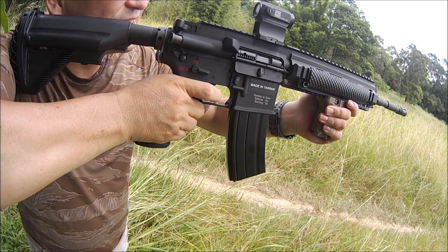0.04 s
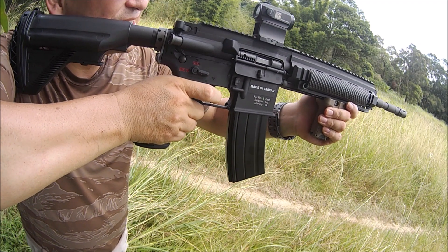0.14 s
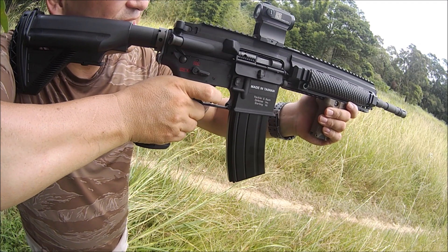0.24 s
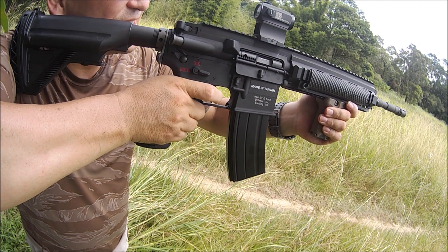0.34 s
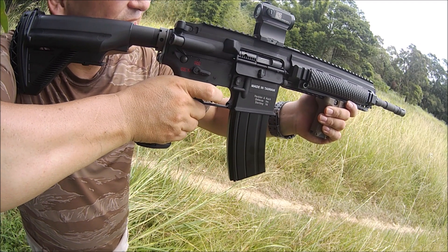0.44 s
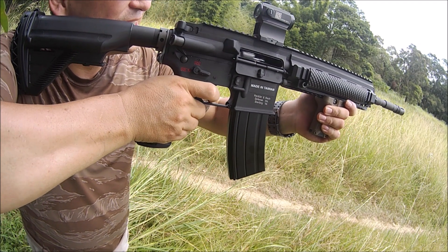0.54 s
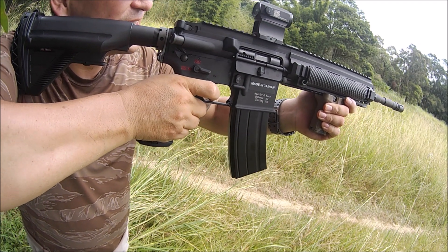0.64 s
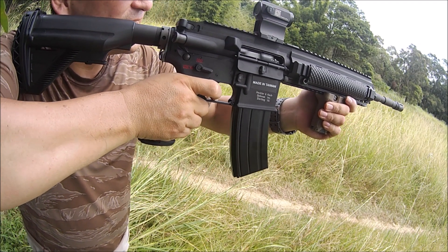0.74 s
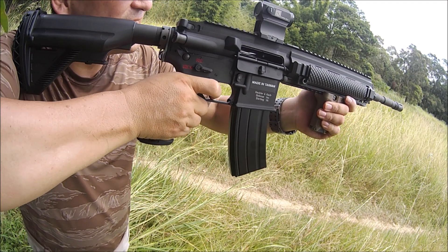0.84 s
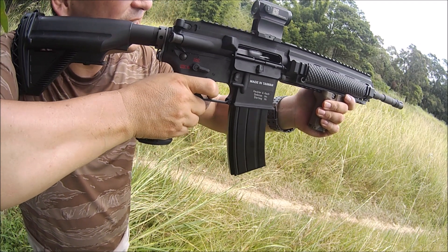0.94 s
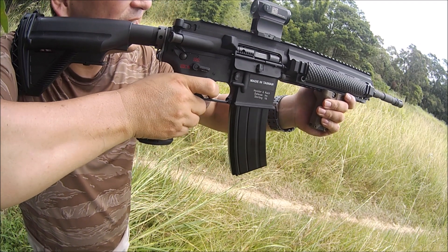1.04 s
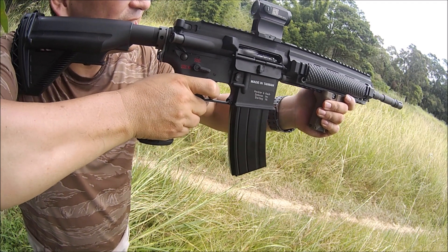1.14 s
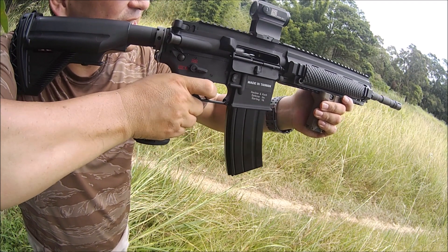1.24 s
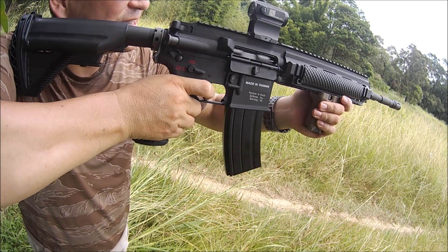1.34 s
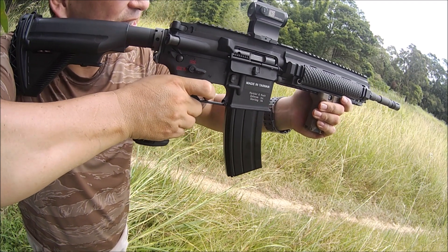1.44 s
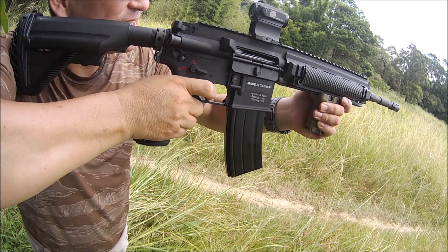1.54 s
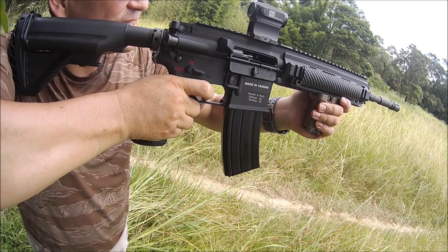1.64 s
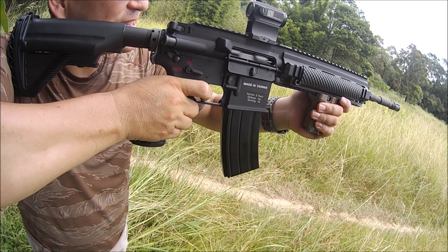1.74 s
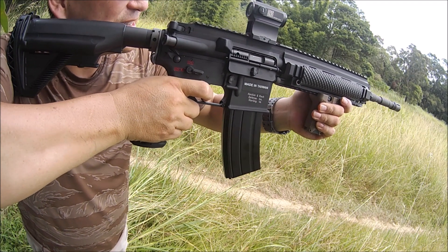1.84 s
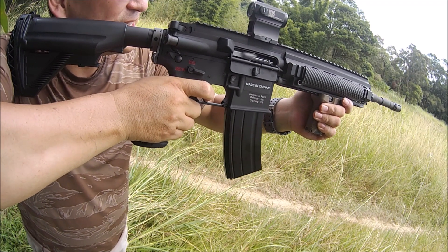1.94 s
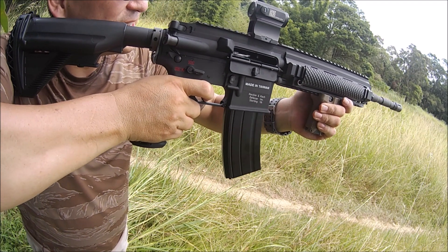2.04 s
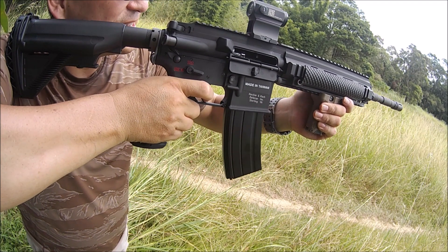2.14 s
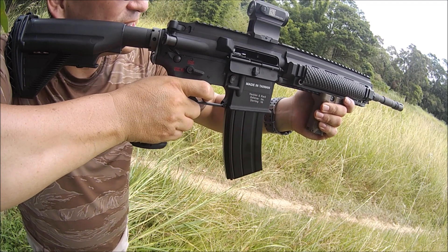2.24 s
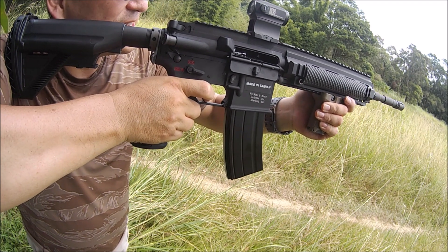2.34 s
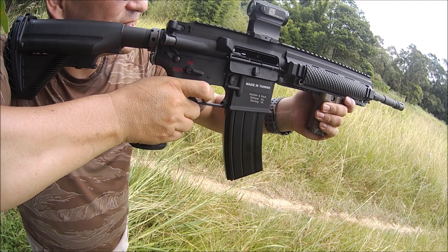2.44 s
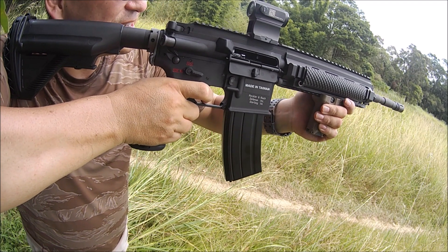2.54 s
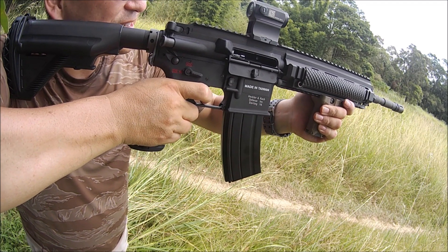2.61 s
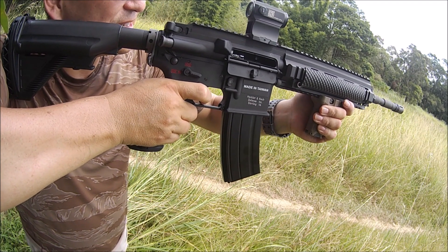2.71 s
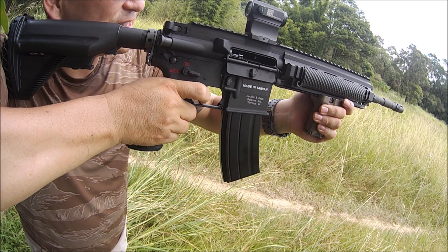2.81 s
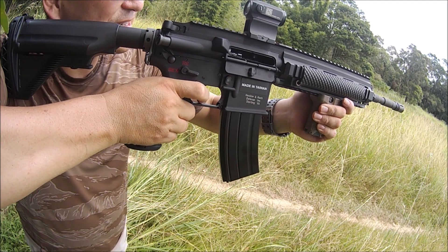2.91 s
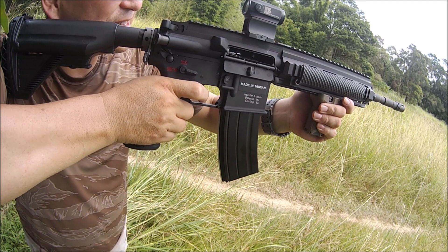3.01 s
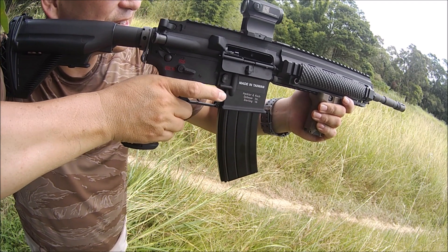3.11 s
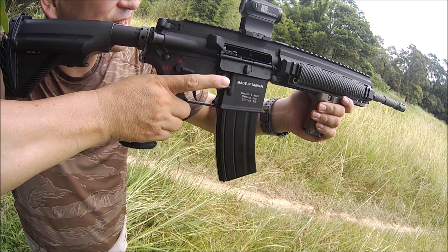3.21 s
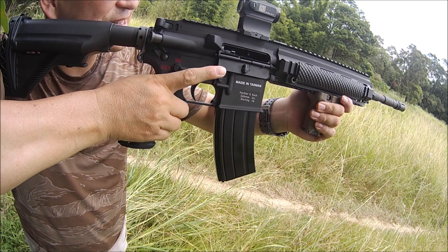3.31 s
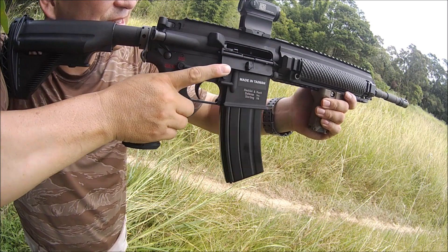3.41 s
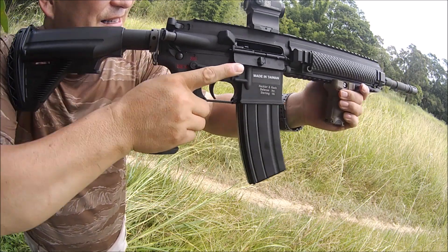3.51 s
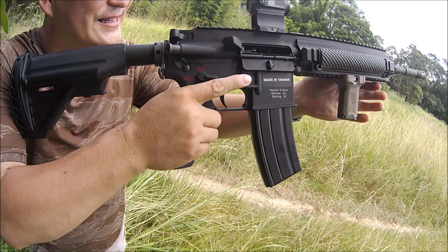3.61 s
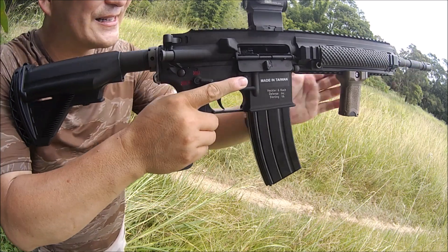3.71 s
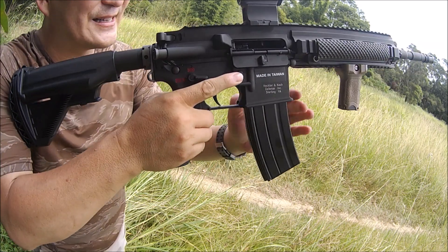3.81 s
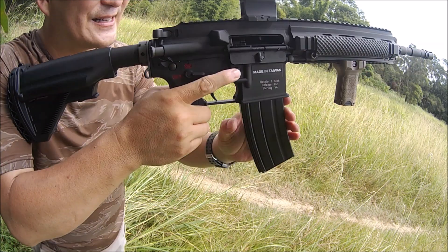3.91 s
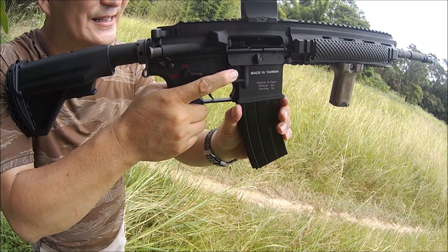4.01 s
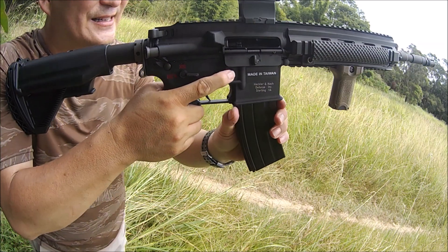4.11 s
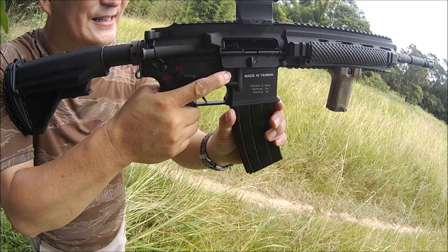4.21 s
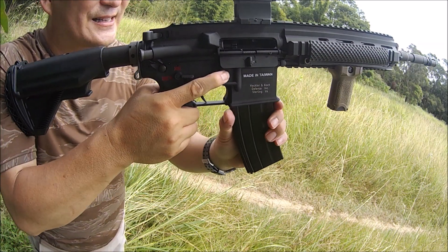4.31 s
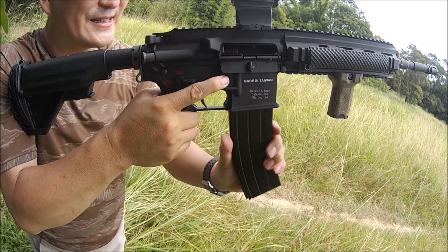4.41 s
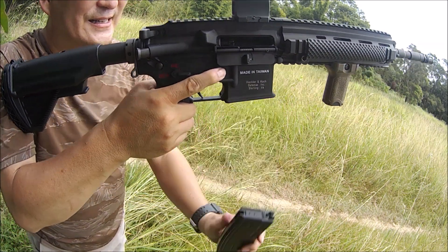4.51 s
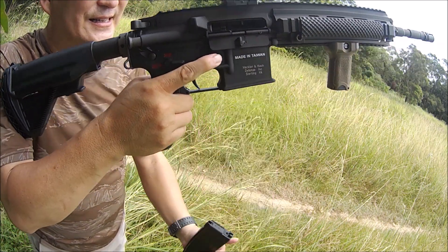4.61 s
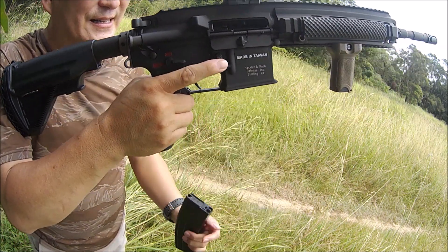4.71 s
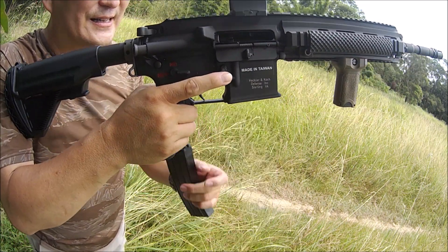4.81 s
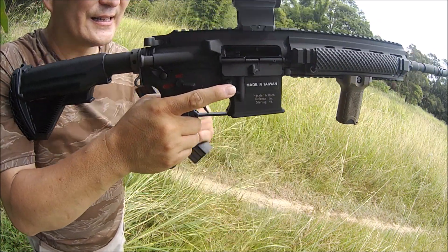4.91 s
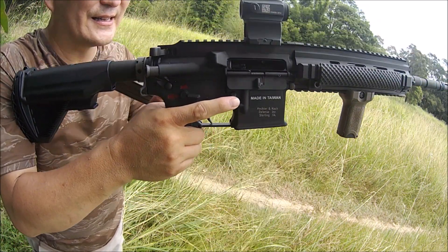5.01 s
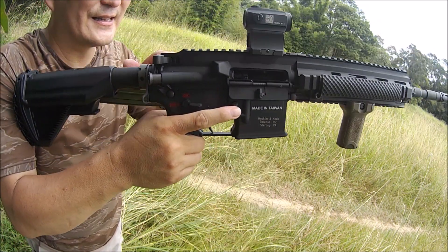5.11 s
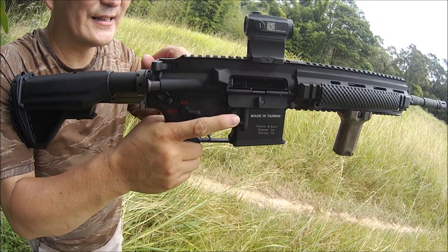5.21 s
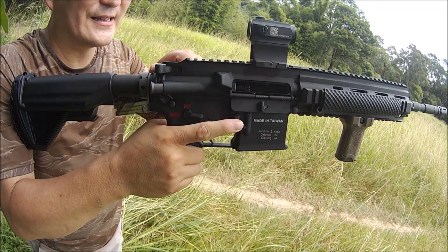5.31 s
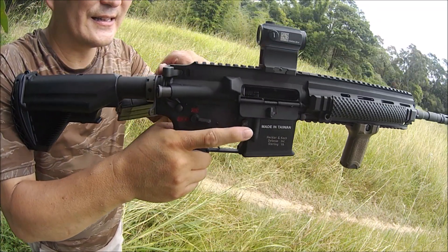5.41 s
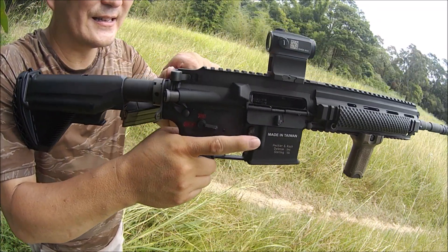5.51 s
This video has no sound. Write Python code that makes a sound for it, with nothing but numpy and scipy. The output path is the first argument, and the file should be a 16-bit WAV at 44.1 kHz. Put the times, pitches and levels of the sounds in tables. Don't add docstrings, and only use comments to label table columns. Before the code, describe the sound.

A gas airsoft rifle rattles off one long automatic burst very close, then a magazine is pulled with clicks amid shrill insects and faint bird notes.

```python
import sys
import numpy as np
from scipy import signal
from scipy.fft import rfft, irfft
from scipy.io import wavfile
from scipy.ndimage import uniform_filter1d

SR = 44100
rng = np.random.default_rng(int(sys.argv[2]) if len(sys.argv) > 2 else 0)


def file_out(sig):
    cols = np.atleast_2d(sig).T
    lim = np.clip(cols, -1, 1)
    pcm = np.round(lim * 32767).astype(np.int16)
    wavfile.write(sys.argv[1], SR, pcm)


def voltage_ratio(level):
    return 10 ** (np.asarray(level, float) / 20)


N = 244755
T = np.arange(N) / SR

# pitch in Hz, width in Hz, level in dB.
STEEL_MODES = [(3100, 1500, -4.5), (4500, 460, -9), (6580, 380, -2), (6990, 240, -4), (7780, 680, -0.5),
               (8900, 300, 0.5), (9400, 600, 2)]
# pitch in Hz, width in Hz, level in dB.
RECEIVER_MODES = [(450, 1000, -7.5), (836, 270, -8), (1100, 240, -11.5), (1542, 300, -4), (1650, 100, -7.5),
                  (2100, 1200, -14)]
# frequency in Hz, level in dB per Hz.
GAS_COLOUR = [(180, -23.5), (300, -15), (938, -9), (1620, -13), (2210, -7.5), (5490, -3), (9010, -1.5),
              (15500, -14)]
# hammer time in seconds, hammer level in dB, sear level in dB,
# milliseconds until the bolt reaches the buffer, buffer level in dB.
ROUNDS = [(0.6671, -1.5, -5.5, 20.7, 2), (.747, -6.5, -12, 18.2, -5.5), (0.8257, -9.5, -24.5, 20.6, -3),
          (0.9053, -8.5, -17.5, 22, -5.5), (0.9838, -7.5, -18.5, 19.5, -7.5),
          (1.0614, -7.5, -27.5, 19, -6.5), (1.14, -9, -15, 19.5, -7), (1.2193, -9, -17.5, 19.8, -8),
          (1.2972, -7.5, -16, 19.6, -9.5), (1.377, -4.5, -13.5, 17.8, -8.5), (1.4565, -9, -15, 17.6, -8),
          (1.5352, -8, -14, 19.8, -5.5), (1.6151, -8.5, -17, 20.7, -7), (1.696, -7, -17, 20, -5),
          (1.7773, -6, -15.5, 19.4, -7.5), (1.8601, -6.5, -16.5, 19, -6), (1.941, -10, -11.5, 20, -5),
          (2.0233, -5, -14.5, 18.9, -6.5)]
# slam time in seconds, slam level in dB,
# milliseconds until the bounce and gas puff, bounce level in dB, puff level in dB.
SLAMS = [(0.6267, 5.5, 5.1, -5, -4), (0.706, 4.5, 4.7, -9.5, -9.5), (0.785, -5, 2.1, 0, -16),
         (.8625, 3, 4.5, -13, -14.5), (0.9411, -1.5, 4.6, -8, -12.5), (1.0216, 0, 0.73, -15.5, -19),
         (1.0983, -6.5, 2.6, -0.5, -14.5), (1.178, -4, 0.79, -3, -13), (1.2553, -0.5, 4.6, -9.5, -16.5),
         (1.3348, 0, 2.9, -9, -18), (1.4153, -1.5, 1.9, -14, -10.5), (1.494, -2.5, 3.35, -9, -17),
         (1.5739, -5, 1.2, -11, -12.5), (1.6523, -4.5, 5.8, -10, -20), (1.7365, -6.5, 2.7, -10.5, -13.5),
         (1.8166, -5, 2.8, -16.5, -12), (1.895, -8.5, 5.6, -2.5, -12), (1.9793, -3.5, 6.8, -10.5, -19.5),
         (2.063, -11, 3, -3, -14)]
REST_DB = 2.5


def curve(rows):
    return np.interp(T, *np.transpose(rows))


def unit(x):
    return x / np.sqrt(np.mean(x ** 2))


def colour(points):
    hz, db = np.transpose(points)
    bins = np.arange(N // 2 + 1) * SR / N + 1
    shape = voltage_ratio(np.interp(np.log(bins), np.log(hz), db))
    return unit(irfft(rfft(rng.standard_normal(N)) * shape, N))


def walk(rate):
    size = int(SR / rate)
    once = uniform_filter1d(rng.standard_normal(N), size)
    return unit(uniform_filter1d(once, size))


def ring(x, hz, width_hz):
    b, a = signal.iirpeak(hz, hz / width_hz, fs=SR)
    return signal.lfilter(b, a, x) * np.sqrt(SR / np.pi / width_hz)


def repeats(rows, counts):
    out = []
    for (s, gap, *rest), count in zip(rows, counts):
        out += [(s + k * gap, k, *rest) for k in range(count)]
    return np.array(out)


def contacts(s, db, ring_ms, rise_ms, slide_db):
    before, length = 400, 3000
    out = np.zeros(N + length)
    t = np.arange(-before, length - before) / SR * 1000
    after = np.maximum(t, 0)
    slide = np.exp(np.minimum(t, 0) / 2.6)
    for at, gain, fall, lead in np.broadcast(s, voltage_ratio(db), ring_ms, voltage_ratio(slide_db)):
        landing = lead * slide + 1 - np.exp(-after / rise_ms)
        out[int(at * SR):][:length] += gain * landing * np.exp(-after / max(fall, .2))
    return out[before:N + before]


def body(modes, s, db, ring_ms, scatter_db, rise_ms, slide_db):
    spot = scatter_db * rng.standard_normal((len(s), len(modes)))
    grit = rng.standard_normal(N) * voltage_ratio(1.62 * rng.standard_normal(N))
    out = 0
    for k, (hz, width_hz, mode_db) in enumerate(modes):
        blows = contacts(s, db + mode_db + spot[:, k], ring_ms, rise_ms, slide_db)
        out = out + (-1) ** k * ring(grit * blows, hz, width_hz)
    return out


def pushes(rows, rebound_hz):
    out = 0
    for s, db, ms in rows:
        out = out + voltage_ratio(db) * np.exp(-.5 * ((T - s) * 2355 / ms) ** 2)
    return signal.lfilter(*signal.butter(1, rebound_hz, "high", fs=SR), out)


def field():
    # frequency in Hz, level in dB per Hz.
    field_colour = [(30, -15.5), (130, -16.5), (330, -25), (1100, -27), (1450, -31), (2050, -27),
                    (2700, -14.5), (4800, -10.5), (9300, -7.5), (10700, -8.5), (12000, -22), (15500, -41.5)]
    spectrum = rfft(colour(field_colour))
    octave = np.log2(np.arange(N // 2 + 1) * SR / N + 1)
    out = 0
    for middle in np.arange(4, 14.6, .5):
        band = np.clip(1 - 2 * np.abs(octave - middle), 0, 1)
        out = out + irfft(spectrum * band, N) * voltage_ratio(.9 * walk(14))
    return out * voltage_ratio(-43.5)


def cicadas():
    # first throb in seconds, gap in seconds, level in dB.
    bouts = [
        (.24, .17, -43),
        (2.31, .173, -42),
        (3.19, .168, -43.5),
        (4.23, .17, -46),
        (4.94, .197, -47.5),
    ]
    throb_counts = [1, 5, 5, 1, 4]
    throb = 0
    for s, _, db in repeats(bouts, throb_counts):
        throb = throb + voltage_ratio(db) * np.exp(-((T - s) / 0.032) ** 2)
    return throb * colour([(3000, -63.0), (4500, -7.5), (7500, -4.0), (9500, -3.5), (11500, -32)])


def crickets():
    # share of the stroke rate, wing pitch in Hz, width in Hz, level in dB, skirt level in dB.
    singers = [
        (1, 10330, 260, -47.5, -12),
        (.935, 10450, 500, -52, -10),
    ]
    # time in seconds, wing strokes per second.
    stroke_rate = [(0, 125.5), (4.05, 125.5), (4.25, 125.22), (4.8, 125.22), (5.55, 125.18)]
    out = 0
    for share, hz, width_hz, db, skirt_db in singers:
        strokes = np.cumsum(share * curve(stroke_rate) * (1 + .0007 * walk(9))) / SR
        turn = np.exp(2j * np.pi * strokes).astype(np.complex64)
        line, song = turn ** 66, 0
        for k in range(67, 102):
            line = line * turn
            off = (k * share * stroke_rate[0][1] - hz) / width_hz
            wing = 1 / (1 + 1j * off) ** 2 + voltage_ratio(skirt_db) / (1 + (off * width_hz / 1300) ** 4)
            uneven = voltage_ratio(3.6 * rng.standard_normal()) * np.exp(.6j * rng.standard_normal())
            song = song + np.complex64(wing * uneven) * line
        out = out + voltage_ratio(db + 1.1 * walk(22)) * unit(song.imag)
    return out


def bird():
    # first note in seconds, gap in seconds, first level in dB,
    # swell in dB per note, middle pitch in Hz.
    phrases = [(.039, 0.098, -54.5, 1, 1037), (.466, 0.11, -59.5, 12, 1010),
               (2.301, .103, -51.5, -0.5, 1040), (2.66, .0565, -51.5, -0.6, 1132),
               (2.945, 0.071, -60, -.5, 1062), (3.205, 0.093, -58.5, 2.2, 1114),
               (3.552, 0.062, -52.5, 0, 1035), (3.853, 0.094, -54, 2, 1146), (4.219, .1, -56.5, -3.5, 1134),
               (4.315, 0.066, -52, -0.5, 1166), (4.53, 0.12, -52.5, 1, 948), (4.77, 0.065, -48.5, -2, 1122),
               (4.868, .1, -54, 1, 980), (4.886, 0.081, -54, 1.5, 1087), (5.545, .1, -58, 1, 1240)]
    note_counts = [4, 1, 4, 4, 3, 4, 5, 3, 1, 2, 2, 4, 1, 3, 1]
    half = 1500
    out = np.zeros(N + 4000)
    t = np.arange(-half, half) / SR
    whistles = repeats(phrases, note_counts)
    chance = rng.uniform(.5, 1.2, (len(whistles), 2))
    for (s, place, first_db, swell_db, middle_hz), (fall, length) in zip(whistles, chance):
        db = first_db + place * swell_db
        hz = middle_hz * (1 - 0.29 * fall * np.tanh(t / 0.027))
        swell = voltage_ratio(db) * np.exp(-(t / (0.013 * length ** .5)) ** 2)
        out[int(s * SR):][:len(t)] += swell * np.sin(2 * np.pi * np.cumsum(hz) / SR)
    out = out[half:N + half] * voltage_ratio(1.5 * walk(180))
    trees = rng.standard_normal(6000) * voltage_ratio(-60 * T[:6000] / 0.3)
    return out + voltage_ratio(-35) * signal.fftconvolve(out, trees)[:N]


def camera_gain():
    duck_db, release_s, creep_s = -18, 2.343, .27
    since = np.maximum(T - release_s, 0)
    cut = (T > ROUNDS[0][0]) * np.exp(-(since / creep_s) ** 1.2)
    return voltage_ratio(REST_DB + duck_db * cut)


def cut_band(x, hz, kind):
    return signal.sosfilt(signal.butter(2, hz, kind, fs=SR, output="sos"), x)


def handling():
    # time in seconds, peak level in dB,
    # hollow share in dB, bright share in dB, main ring in Hz.
    knocks = [(3.039, -51.5, -9, -11.5, 1300), (3.751, -53.5, 8, -9, 750), (3.822, -55, -11, -15, 1945),
              (4.1471, -30.5, -21, 6, 2330), (4.1484, -41, -26, -6.5, 1440), (4.385, -48.5, -6, 2.5, 2100),
              (4.4351, -39, -17, -18, 2900), (4.438, -32, -17, 4, 1820), (4.4488, -40, -13, -2, 1730),
              (4.453, -45.5, 11, -5.5, 2380), (4.4625, -16, 0.5, -9, 3000), (4.467, -27.5, -5, -19, 2400),
              (4.6101, -27.5, -18, -1, 1650), (4.67, -48, -16.5, -12.5, 1880), (5.119, -30, 4, -9.5, 1720),
              (5.131, -27, 4.5, -8, 1300), (5.144, -45.5, 7.5, -7.5, 940), (5.292, -46, 8.5, -21, 391),
              (5.33, -54.5, 7, -20, 337), (5.3365, -32, -0.5, -2.5, 3290), (5.35, -56, 13, -16, 419),
              (5.454, -53.5, 10.5, -21.5, 1270)]
    # pitch in Hz, width in Hz, level in dB.
    shell_modes = [
        [(410, 2300, 8), (900, 196, 2.5), (1150, 520, -11.5)],
        [(3060, 1500, 3), (4850, 2600, 9.5), (6540, 820, 7), (8820, 1100, 7)],
    ]
    magazine_drag, drag_ms = (4.424, -54, 3.5, 8, 2400), 45
    s, db, hollow_db, bright_db, knock_hz = np.transpose(knocks + [magazine_drag])
    ring_ms = np.append(1.7 - 0.2442 * (db[:-1] + 23), drag_ms)
    hollow = body(shell_modes[0], s, db + hollow_db - 5, ring_ms, 1.5, .1, -28)
    bright = body(shell_modes[1], s, db + bright_db - 5, ring_ms, 1.5, .1, -28)
    part = 0
    for at, size_db, ms, hz in zip(s, db, ring_ms, knock_hz):
        touch = contacts([at], [size_db + 3], 0.52 * ms, 0.11, -52) * (1 + 1.7 * rng.standard_normal(N))
        part = part + ring(touch, hz, hz / 4.9)
    spark = body([(13200, 2400, -15.0)], s, db + 2 * bright_db, ring_ms, 1.5, .1, -25.0)
    hollow = cut_band(hollow, (250., 1600.), "band")
    part = cut_band(cut_band(part, 350., "high"), 350., "high")
    bright = cut_band(bright, (2400., 10500.), "band")
    return hollow + part + bright + cut_band(spark, 11000., "high")


def leak():
    # time in seconds, level in dB.
    leak_level = [
        (.503, -95),
        (.53, -13),
        (.565, -12),
        (.61, -22),
        (.7, -29),
        (1.0, -35),
        (2.09, -37),
        (2.145, -67),
        (2.32, -88),
    ]
    scrape = voltage_ratio(curve(leak_level) + 5 * walk(260))
    rough = rng.standard_normal(N) * scrape
    rattle = sum(voltage_ratio(db) * ring(rough, hz, width_hz) for hz, width_hz, db in RECEIVER_MODES + STEEL_MODES)
    return colour(GAS_COLOUR) * scrape + voltage_ratio(-11) * rattle


def tube():
    # pitch in Hz, level in dB, seconds to fall 60 dB.
    tube_modes = [(354, -48, 0.22)]
    after = np.maximum(T - 2.08, 0)
    return sum(voltage_ratio(db - 60 * after / t60) * np.sin(2 * np.pi * hz * after) for hz, db, t60 in tube_modes)


def gas_thumps():
    # time in seconds, level in dB, width in milliseconds.
    stray_puffs = [(.5318, -24, 1.3), (.5472, 8, 3), (.6221, -13.5, 1.4), (.8493, -14, 1.45),
                   (.9287, -26, 3.1), (1.1117, -26, 2), (1.299, -22, 2), (1.3782, -23.5, 1.7),
                   (1.6368, -11.5, 0.88), (2.0247, -25, 3)]
    # time in seconds, level in
    # dB, # width in milliseconds.
    surges = [
        (.5515, -2, 4),
        (.559, -3, 8),
        (.569, -14, 14),
        (2.2, -59, 30),
    ]
    slam_puffs = [(at + ms / 1000, puff_db, 1.76) for at, _, ms, _, puff_db in SLAMS]
    return pushes(surges, 4.) - 1.02 * pushes(stray_puffs + slam_puffs, 22.)


def strikes():
    # time in seconds, peak level in dB, ring in milliseconds, receiver share in dB.
    clatter = [(.5165, -19.5, 4, -5.5), (.5262, 0, 1.8, -23), (.5324, 0, 8.9, -26.5), (.541, 14.5, 4.8, 1),
               (.5524, 6.5, 4.1, -16.5), (.5602, -6, 1.6, -24), (.5708, -1, 2.6, -16.5),
               (.5774, -3, 2.8, -10.5), (0.5824, -9.5, 3, -14), (.589, 6, 2.7, -12.5),
               (.6017, 1, 1.4, -3.5), (.6093, 0, 5, -13.5), (.617, -2.5, 3, -3), (0.622, -3, 2, -6),
               (.6574, -12.5, 1.8, -8.5), (.6752, -8, 2.2, -10), (1.129, -14.5, 1.9, -5),
               (2.0767, -5.5, 3.1, -16.5), (2.091, -15, 0.72, -12.5), (2.0962, -32, 1.8, -9.5),
               (2.109, -28, 1.8, -5), (2.136, -41, 2.3, -20)]
    hammer_s, hammer_db, sear_db, back_ms, back_db = np.transpose(ROUNDS)
    slam_s, slam_db, bounce_ms, bounce_db, _ = np.transpose(SLAMS)
    back_s = hammer_s + back_ms / 1000
    bounce = (1.8, -12.5, -15.5)
    # (ring in ms, receiver share in dB, scrape before it in dB)
    cycle = [(hammer_s - .0196, sear_db, (4.6, -8, -25.5)),
             (hammer_s, hammer_db, (2.4, -12, -10.5)),
             (back_s - .0075, -14 + 0.73 * hammer_db, bounce),
             (back_s, back_db, (2.8, -15.5, -6)),
             (slam_s - .0066, -12.5 + .45 * slam_db, (2.4, -4.5, 2)),
             (slam_s, slam_db, (3.24, -6.5, -25)),
             (slam_s + bounce_ms / 1000, bounce_db, bounce)]
    rows = []
    for s, db, kind in cycle:
        rows += [(at, size_db, *kind) for at, size_db in np.broadcast(s, db)]
    return np.transpose(rows + [(*row, -18) for row in clatter])


def rifle():
    s, db, ring_ms, receiver_db, slide_db = strikes()
    slide_db = slide_db - 7.5
    steel = body(STEEL_MODES, s, db - 10, 0.98 * ring_ms, 2.5, 0.1, slide_db)
    hollow = body(RECEIVER_MODES, s, db + receiver_db + 3, 0.86 * ring_ms, 3.0, 0.14, slide_db)
    spit = colour(GAS_COLOUR) * contacts(s, db - 5.0, 1.095 * ring_ms, 0.43, slide_db)
    near = steel + hollow + spit
    t = T[:8000]
    slope = rng.standard_normal(len(t)) * voltage_ratio(-60 * t / .15) * (t > .004)
    wash = signal.fftconvolve(near, slope)[:N] * voltage_ratio(-49)
    return near + wash + leak() + tube() + gas_thumps()


def scene():
    hillside = voltage_ratio(-REST_DB) * bird() + field() + cicadas() + crickets()
    return (rifle() + handling() + camera_gain() * hillside)[None]


def thin_blocks(x):
    block_s = [0.153, .342, .47, 1.113, 1.233, 1.454, 2.348, 3.222, 3.329, 3.373, 3.498, 4.032, 4.717,
               5.381]
    size, count = 1600, 20
    width_hz, tone_db, left_db = 39, 7.5, -19.5
    out, fade = x.copy(), np.sqrt(np.hanning(size))
    hz = np.arange(size // 2 + 1) * SR / size
    for at in (np.array(block_s) * SR).astype(int) - size // 2:
        spectrum = rfft(x[at:at + size] * fade)
        tops = signal.find_peaks(np.abs(spectrum), distance=11)[0]
        strength = np.abs(spectrum[tops]) / hz[tops] ** .25
        tops = tops[np.argsort(-strength)[:count]]
        tones = np.exp(-((hz[:, None] - hz[tops]) / width_hz) ** 2).sum(axis=1)
        keep = voltage_ratio(tone_db) * tones + voltage_ratio(left_db)
        out[at:at + size] += irfft(spectrum * (keep - 1), size) * fade
    return out


def roll_off(x):
    return signal.sosfilt(signal.butter(12, 15680, fs=SR, output="sos"), x)


def record(dry):
    thinned = thin_blocks(1.016 * dry[0])[None]
    return roll_off(np.clip(thinned, -1, 1))


dry = scene()
out = record(dry)
file_out(out)
```